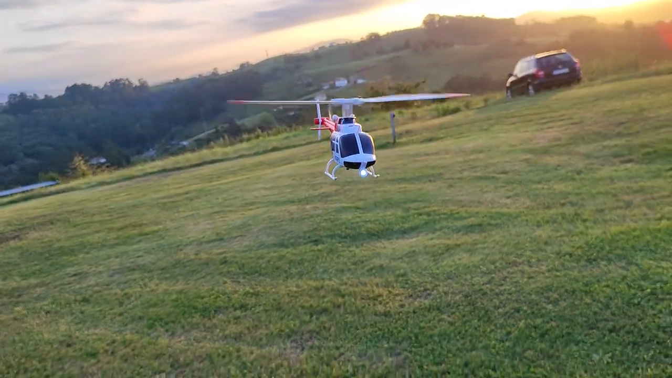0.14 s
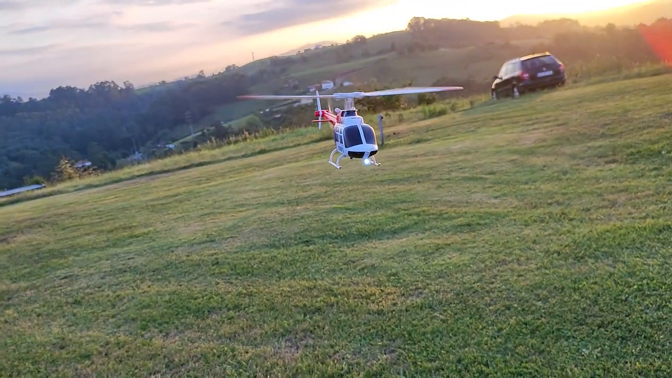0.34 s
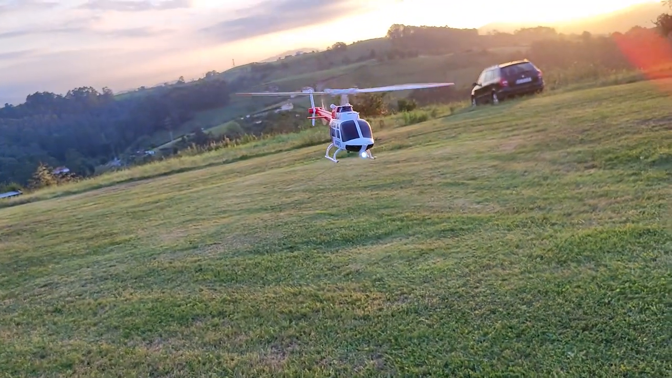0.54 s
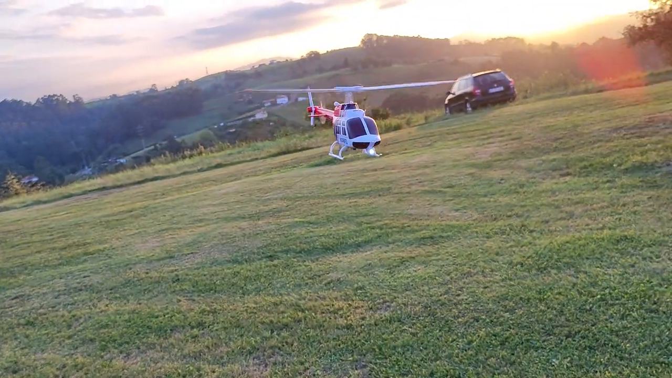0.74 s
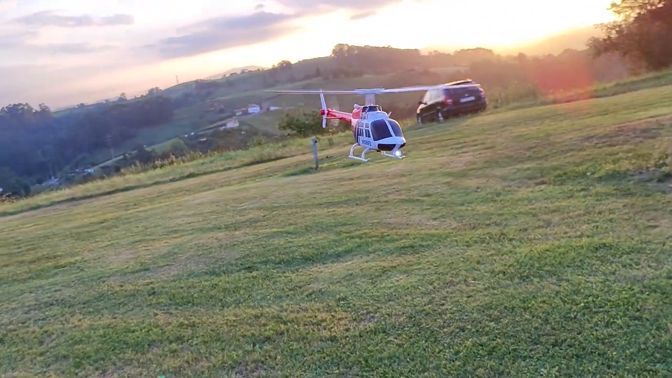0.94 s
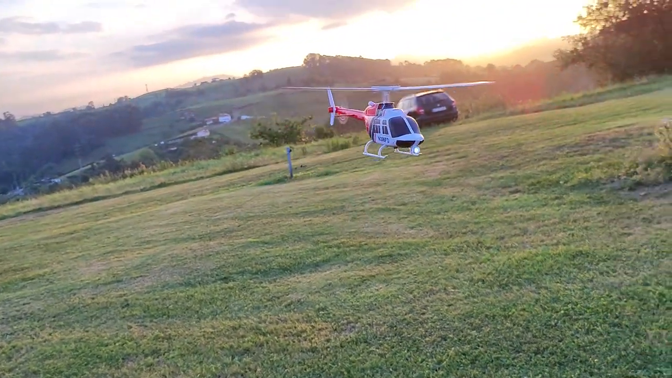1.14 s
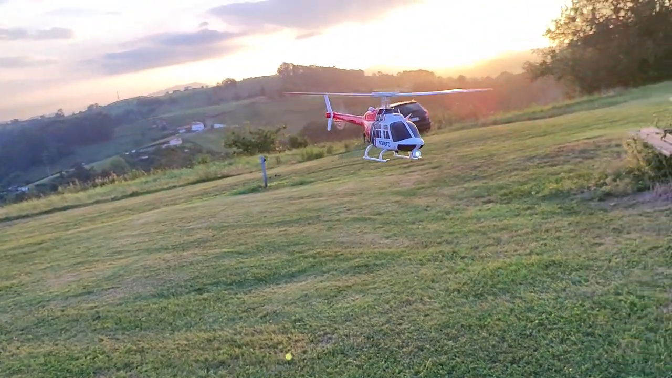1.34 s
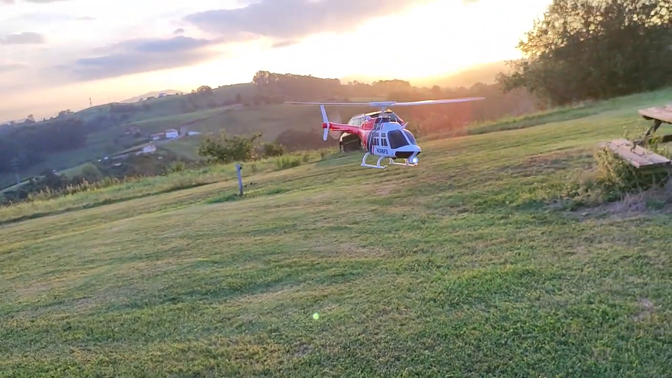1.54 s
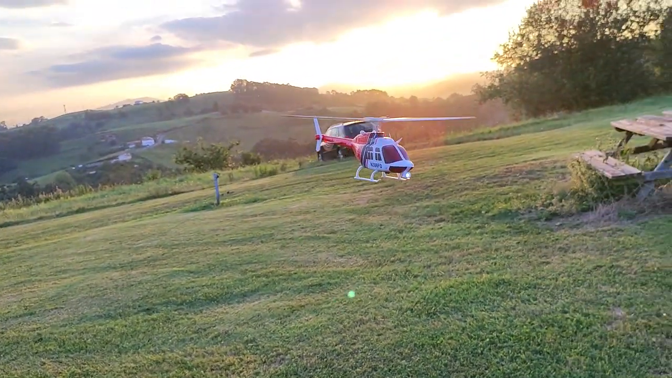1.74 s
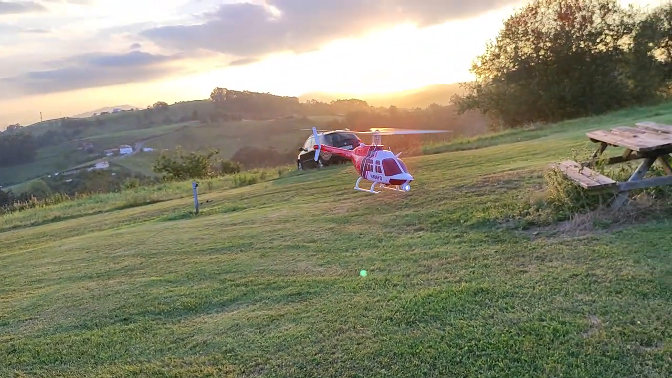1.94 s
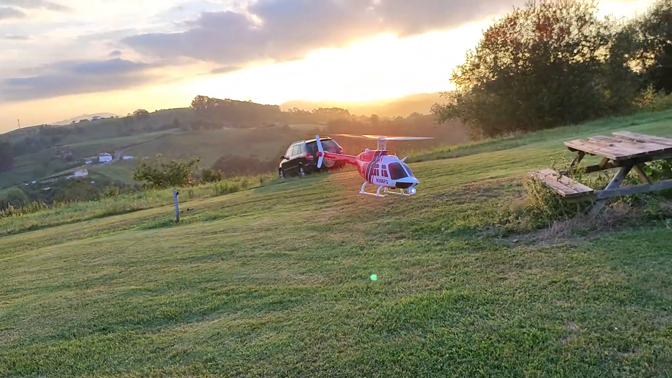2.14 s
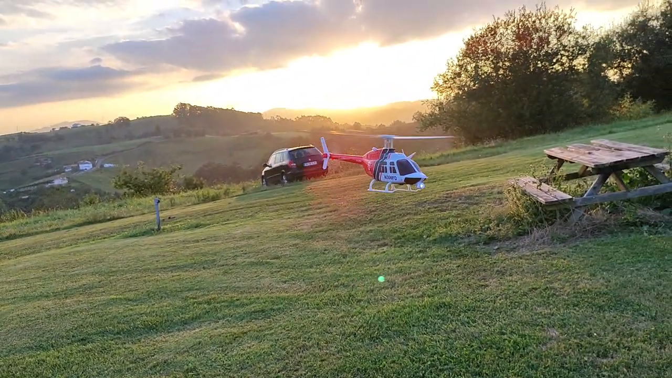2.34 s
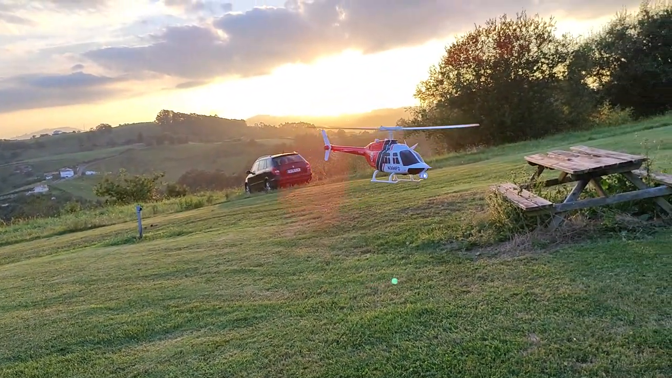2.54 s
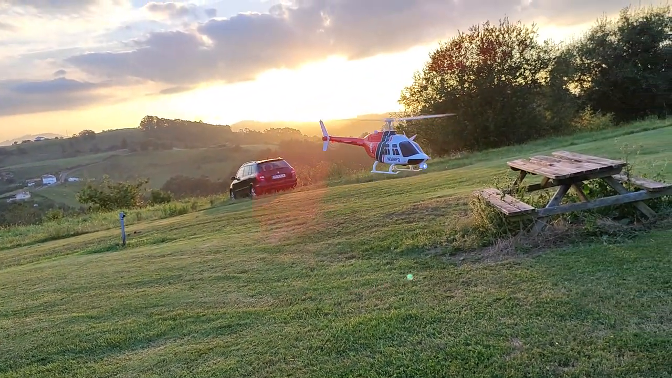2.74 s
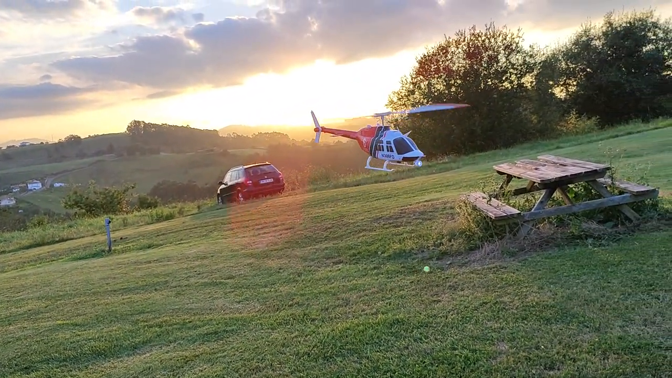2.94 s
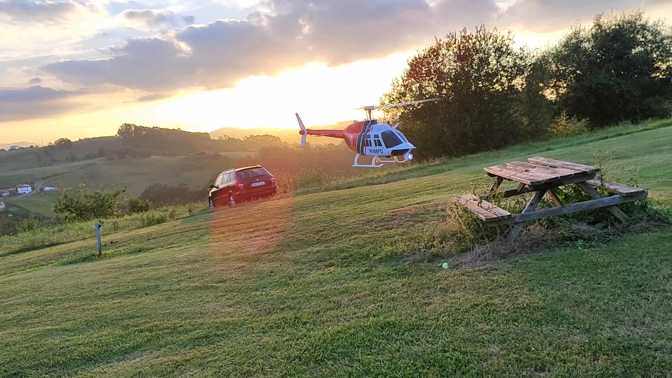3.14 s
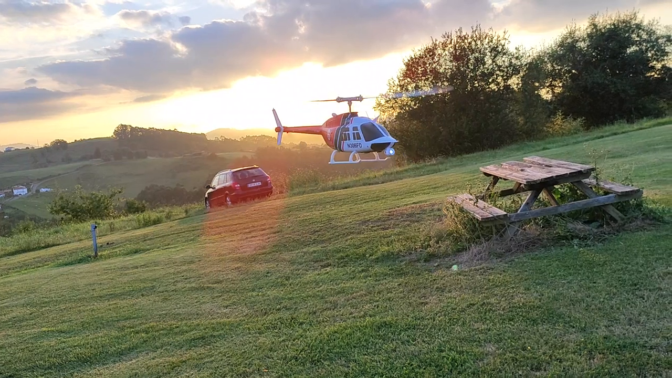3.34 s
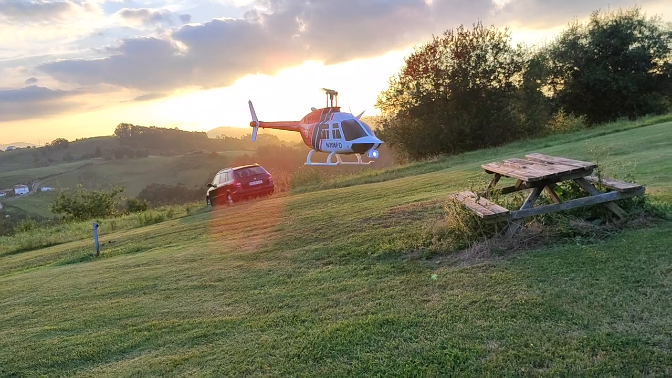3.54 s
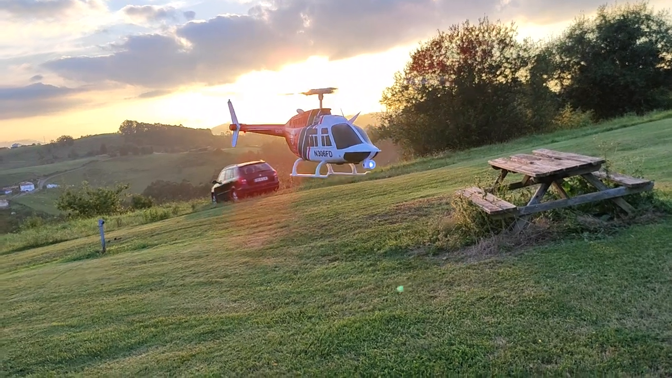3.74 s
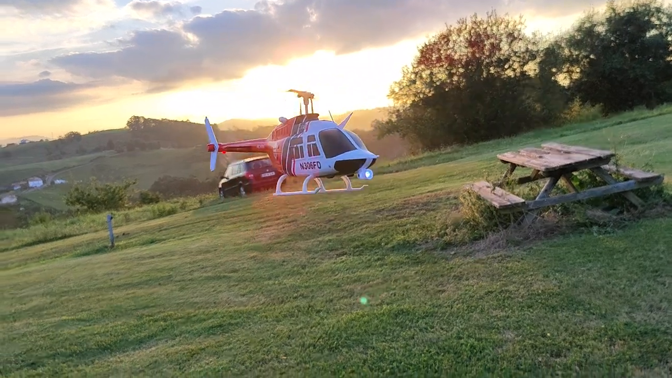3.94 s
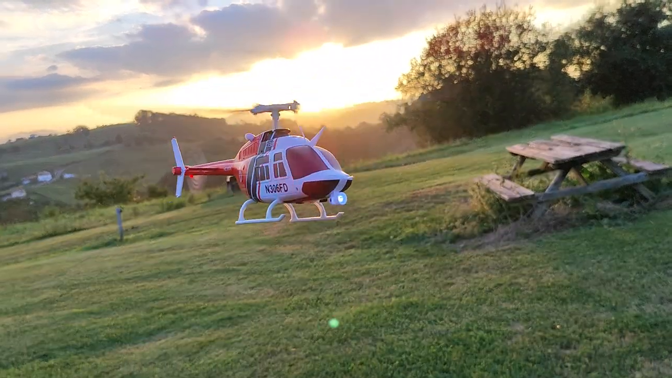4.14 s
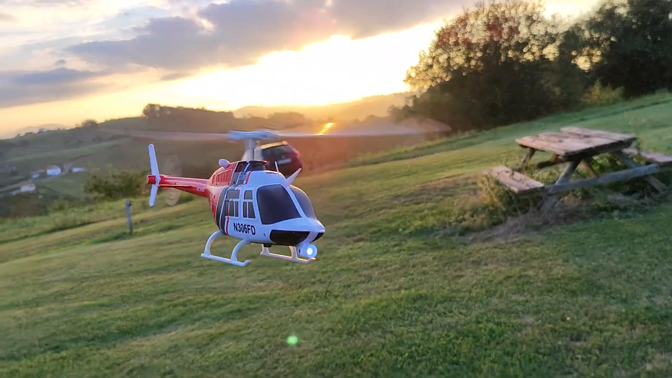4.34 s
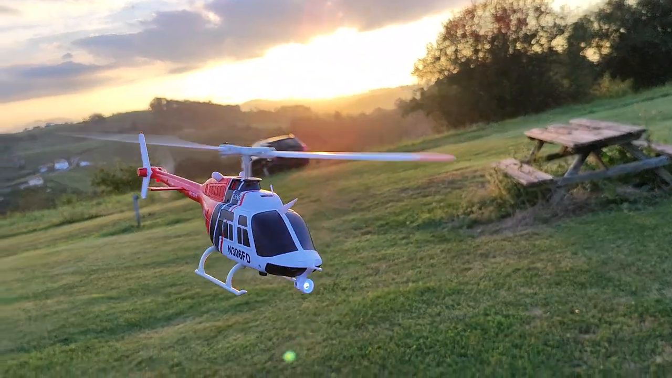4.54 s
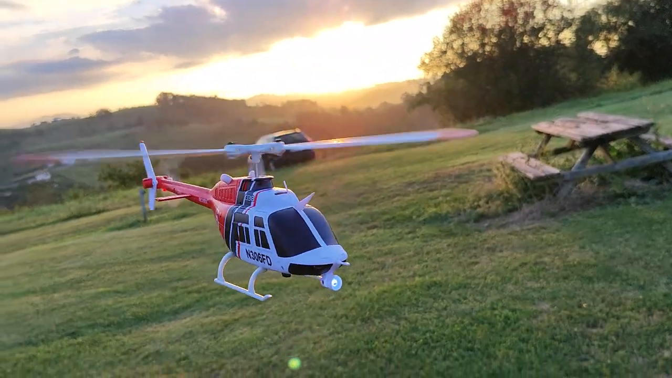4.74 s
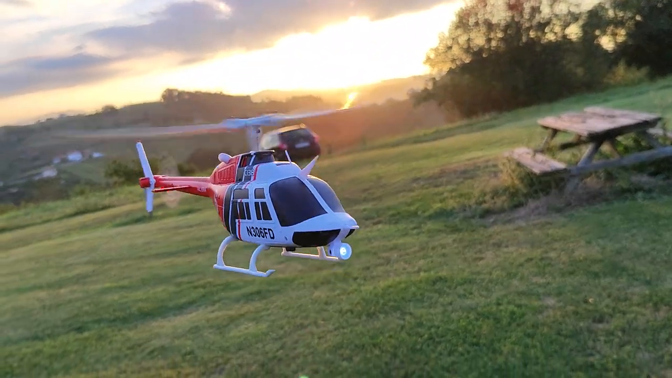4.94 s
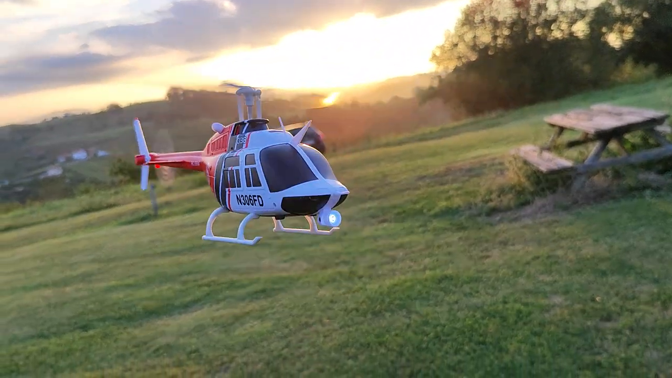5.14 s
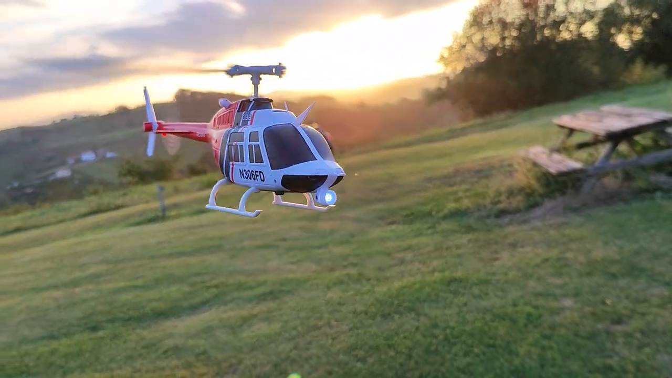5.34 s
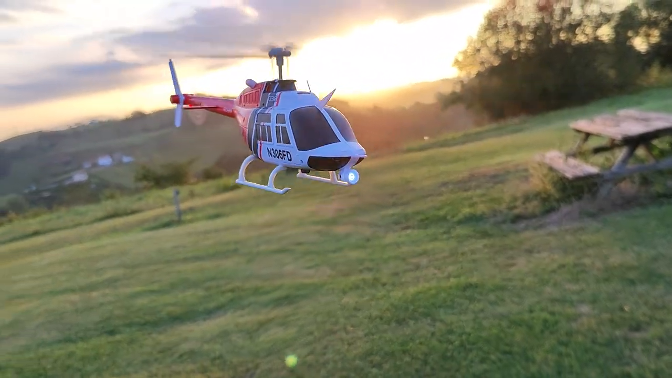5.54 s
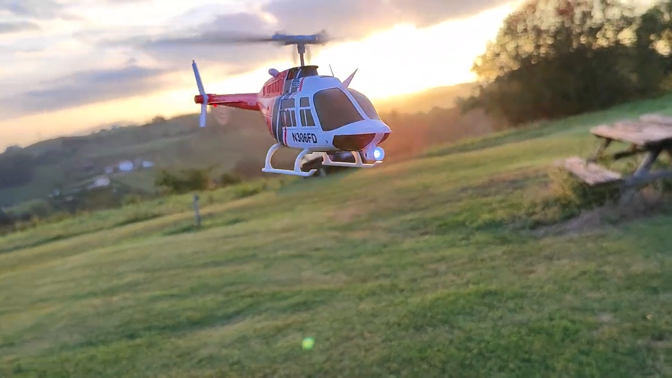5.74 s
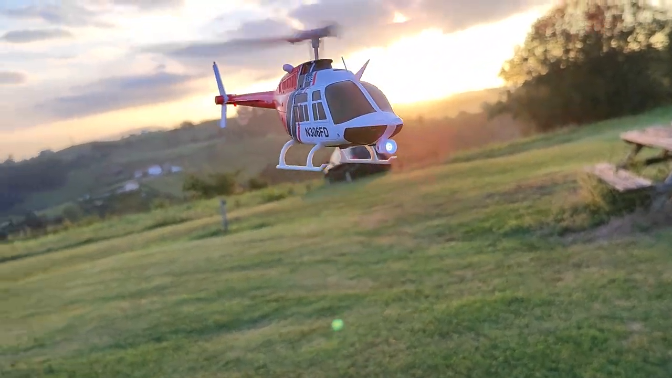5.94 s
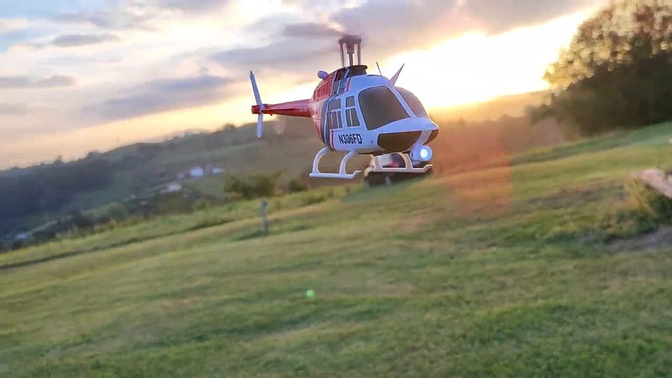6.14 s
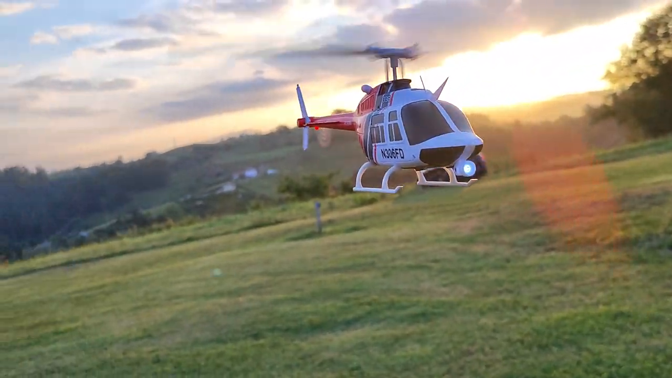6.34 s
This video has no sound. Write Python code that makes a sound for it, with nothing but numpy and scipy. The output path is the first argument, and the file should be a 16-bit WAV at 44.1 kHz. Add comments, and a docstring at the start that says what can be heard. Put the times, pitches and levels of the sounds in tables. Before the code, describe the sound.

Shrill high whine and hissing rotor wash of a small remote-controlled helicopter, fading as it moves away, then surging back near the microphone.

```python
"""A piercing gear whine leads: a small electric model helicopter hovers, drifts off and comes close.
One head speed drives the two blades, a motor geared nine to one and a nine-tooth pinion, whose third
mesh harmonic is the whine. Drive and blades are sums of multiples of that speed; noise shaped by
frequency is the air rushing off the blades. A hunting tail rotor and a faint breeze lie behind."""
import sys
import numpy as np
from scipy import signal
from scipy.fft import rfft, irfft, next_fast_len
from scipy.io import wavfile
from scipy.ndimage import uniform_filter1d, map_coordinates

SR = 44100
rng = np.random.default_rng(int(sys.argv[2]) if len(sys.argv) > 2 else 0)


def unload_wav(signal):
    """Save mono or channel-first audio to the path in sys.argv[1] as 16-bit WAV at rate SR, clipped to [-1, 1]."""
    wavfile.write(
        sys.argv[1],
        SR,
        np.round(np.clip(np.atleast_2d(signal).T, -1, 1) * 32767).astype(np.int16),
    )


N = 281358
T = np.arange(N) / SR  # seconds

# An order is a multiple of the main rotor speed. Levels are before the trims and swells in each layer.
# Flight and head speed
# main rotor speed before smoothing: start_s, speed_turns_per_s
HEAD_SPEED = [(0, 47.62), (0.14, 47.66), (0.3, 47.6), (0.57, 47.36), (0.72, 47.29), (0.86, 47.39),
              (1.08, 47.45), (1.38, 47.31), (1.58, 47.16), (1.78, 47.31), (1.9, 47.55), (2.08, 47.69),
              (2.3, 47.43), (2.48, 47.1), (2.58, 46.88), (2.8, 46.54), (3.08, 46.41), (3.25, 46.2),
              (3.45, 46.09), (3.9, 46.35), (4.28, 46.62), (4.41, 46.97), (4.53, 47.69), (4.63, 47.87),
              (4.73, 48.04), (4.9, 47.57), (5.1, 47.04), (5.38, 46.72), (5.5, 46.86), (5.77, 46.5),
              (5.97, 46.53), (6.17, 46.47), (6.38, 46.63)]
# distance from helicopter to microphone: start_s, distance_m
FLIGHT_PATH = [(0, 2.17), (1.2, 2.21), (2.2, 2.27), (3.1, 2.7), (3.7, 2.62), (4.2, 1.47), (4.8, 1.3),
               (5.3, 1.06), (5.8, 1.26), (6.38, 1.05)]
# time by which sound reaches the left port first: start_s, lead_ms
LEFT_LEAD = [(0, .072), (.5, .048), (1.4, .09), (2.1, .092), (2.7, .062), (3.15, .055), (3.5, .105),
             (3.95, .108), (4.5, .19), (5.3, .204), (5.9, .178), (6.38, .148)]

# Gears
# the whine, beamed by the gears so that it swells and fades as the body turns: start_s, level_db
WHINE_LEVEL = [(0, -32.4), (0.12, -28.6), (0.6, -29.3), (1, -29.2), (1.35, -29.7), (1.9, -32.7),
               (2.4, -35.8), (2.7, -51.3), (3.25, -49.0), (3.5, -42.9), (3.85, -45.6), (4.25, -33.2),
               (4.55, -24.7), (4.8, -24.3), (5, -24.5), (5.4, -27.2), (5.75, -36.7), (6.15, -28.5),
               (6.38, -39.4)]
# stereo place of the whine: start_s, left_minus_right_db
WHINE_PAN = [(0, -9.6), (1.2, -10.8), (2.4, -11.0), (2.8, 5.3), (3.6, -2.0), (3.95, 4.3), (4.35, -19.7),
             (4.6, -3.0), (4.85, -2.1), (5.3, -20.3), (5.6, -4.7), (6, -27.7), (6.38, -11.6)]
# gear mesh tone: start_s, level_db
MESH_LEVEL = [(0, -43.5), (0.2, -47.5), (0.9, -46), (1.4, -51), (2.2, -53.5), (2.6, -46.5), (3.1, -48.5),
              (3.6, -42.5), (4.25, -40.5), (4.5, -39), (4.8, -50), (5.1, -39.5), (5.35, -36.5),
              (5.7, -43.5), (6.2, -38), (6.38, -38.5)]
# stereo place of the mesh tone: start_s, left_minus_right_db
MESH_PAN = [(0, 3.5), (0.9, -3.5), (1.4, -2.4), (2.3, 4.8), (2.7, 5.3), (3.1, 8.6), (3.5, 2), (4, 2.5),
            (4.4, 3), (4.8, -9.2), (5.2, 0.6), (5.6, 2.6), (6.38, 7.7)]
# lines beside the mesh tone: order, relative_level_db
MESH_SIDEBANDS = [(71, -9), (72, -1), (73, -11), (77, -9), (78, -10), (79, -11), (82, -3), (83, -8),
                  (84, -9), (85, -2), (86, -7), (87, -13), (90, -4)]
# unevenness of the gear teeth round one turn: order, relative_level_db
TOOTH_RUNOUT = [(1, 0), (2, -10), (3, -15), (4, -11), (5, -17)]
# envelope of the rattle round the whine: order, relative_level_db
CHATTER_ENVELOPE = [(219, -24), (230, -19), (236, -22), (238, -9), (239, -5), (240, -15), (242, -13),
                    (244, -9), (246, -4), (247, 0), (248, -13), (249, -7), (250, -16), (252, -8),
                    (254, -16), (262, -25)]
# lines beside the whine, from the pinion wobbling once per motor turn: order, relative_level_db
PINION_WOBBLE = [(207, -11), (215, -6), (216, -2), (217, -8), (224, -6), (225, 3), (226, -8), (233, -7),
                 (234, -3), (235, -7), (261, -3), (270, -15)]

# Air: noise spectra
# low downwash: frequency_hz, relative_level_db_per_hz
WASH_SPECTRUM = [(150, -22), (300, -25), (400, -9), (550, -6.5), (680, -4.5), (850, -3), (1100, -8.5),
                 (1600, -14.5), (4000, -54)]
# mid-range rush: frequency_hz, relative_level_db_per_hz
RUSH_SPECTRUM = [(500, -24), (1000, 0), (1350, 8), (1650, 4.5), (2050, 7.5), (2500, 6), (2800, -4.5),
                 (3150, -2.5), (3450, 5.5), (3750, 6), (4050, 10.5), (4600, -2.5), (6500, 1), (9000, -25)]
# treble hiss: frequency_hz, relative_level_db_per_hz
HISS_SPECTRUM = [(2500, -34), (4600, 0.5), (5800, -2.5), (7600, -5.5), (8150, -16.5), (8900, 1),
                 (10200, 5.5), (11000, 1.5), (11500, 12), (12200, 7), (13200, -25), (14300, -2),
                 (15400, -0.5), (16000, -12)]
# downwash: start_s, level_db
WASH_LEVEL = [(0.0, -54.5), (0.35, -57.5), (2.74, -60.5), (3.0, -63), (3.75, -60.5), (4.3, -52.5),
              (4.74, -59.5), (4.82, -56), (5.17, -55.5), (5.22, -51.5), (5.61, -57), (6.38, -52.5)]
# hiss: start_s, level_db
HISS_LEVEL = [(0.0, -57.5), (1.06, -57), (1.94, -58.5), (2.18, -62.5), (2.5, -55.5), (3.14, -59),
              (3.59, -54.5), (4.37, -47), (4.73, -53.5), (5.15, -49), (6.17, -48.5), (6.38, -47.5)]

# Motor
# its once-a-turn hum: start_s, level_db
HUM_LEVEL = [(0.0, -65.5), (1.35, -56.5), (3.32, -55.5), (4.09, -47.5), (4.69, -51), (5.08, -47.5),
             (6.34, -48.5), (6.38, -51)]
# its overtones: order, level_db, power_of_distance_it_falls_with, left_minus_right_db
MOTOR_TONES = [(18, -41, 1.22, 0.4), (27, -47, 0.85, 1)]
# its seventh overtone: start_s, level_db
WHISTLE_LEVEL = [(0, -70), (2.5, -70), (3.0, -58.5), (3.9, -56.5), (4.7, -60), (6.38, -56)]
# buzz of the drive and its shell: order, relative_level_db
SHELL_ORDERS = [(14, -12), (20, -6), (22, -10), (24, -9), (25, -12), (31, -4), (32, -6), (38, -10),
                (40, -11), (41, -9), (43, -11), (45, -2), (50, -10), (54, -10)]
# its high overtones: order, relative_level_db
SINGING_ORDERS = [(162, -7), (189, -6), (322, -8), (324, 0), (325, -9), (326, -5)]

# Blades
# thrum of the two blades: start_s, level_db
THRUM_LEVEL = [(0.0, -62), (2.54, -59.5), (2.95, -64), (3.23, -57), (3.64, -61), (4.05, -51.5),
               (4.34, -51.5), (4.73, -42), (6.38, -47.5)]
# octave of the thrum: start_s, level_db
OCTAVE_LEVEL = [(0, -66.5), (1, -73.5), (2, -66), (3.3, -71), (3.8, -56), (4.5, -59), (4.9, -55),
                (5.3, -58.5), (5.7, -54.5), (5.88, -68), (6.1, -55.5), (6.38, -62)]
# fourth and higher blade overtones: start_s, level_db
FLUTTER_LEVEL = [(0, -56), (.9, -61), (2, -60.5), (2.8, -64), (3.6, -67), (4.4, -65), (6.38, -62.5)]
# higher blade overtones: order, relative_level_db
BLADE_ORDERS = [(10, 3), (11, -4), (12, -1), (13, -5)]
# throbs as the blades cut their own wake: centre_s, octave_and_third_swell_db, fourth_swell_db
WAKE_THROBS = [(.13, 9, -3), (.42, 11.5, -5), (.53, -0.5, 4), (.78, 7.5, 7), (1.0, -1.5, 9), (1.35, 10, -1),
               (1.57, 5.5, -1), (1.8, 0, 6), (2.0, 4, 8), (2.57, 2.5, 10), (2.75, 3, 8), (2.86, 4.5, 8),
               (4.4, 2, 7), (5.05, 2, 7), (5.37, 0.5, 8), (6.15, 2.5, 2)]

# Tail rotor and breeze
# tail blade rate before its waver: start_s, rate_hz
TAIL_RATE = [(0, 257), (.8, 248), (1, 255), (1.3, 248), (1.8, 257), (2.1, 254), (2.3, 248), (2.6, 254),
             (3, 255), (3.45, 270), (3.55, 264), (3.75, 272), (3.89, 264), (4.38, 273), (4.47, 264),
             (4.56, 267), (4.8, 259), (5.3, 248), (5.7, 245), (6.15, 267), (6.38, 258)]
# tail rotor buzz: multiple_of_tail_blade_rate, relative_level_db
TAIL_ORDERS = [(1, -17), (2, 4), (3, -8), (4, -11), (5, 5), (6, -9), (7, 0), (8, -6), (9, -9), (10, -5)]
# faint breeze: frequency_hz, relative_level_db_per_hz
BREEZE_SPECTRUM = [(15, -9), (40, -4), (80, 5.5), (140, 3), (230, -2.5), (400, -1.5), (1000, -46),
                   (4000, -64)]

# Microphone
# colour of the two ports: frequency_hz, left_minus_right_db
PORT_COLOUR = [(100, -5), (700, 0.5), (1400, 4), (2200, -2), (2900, 0), (4000, 5.5), (6000, 6.5),
               (7600, 1.5), (9000, -12), (10400, -3), (11500, -9), (12800, -6), (14000, 3), (15000, 5)]
# phase of the left port against the right: frequency_hz, phase_rad
PORT_PHASE = [(900, 0), (1400, -.15), (1900, -.8), (2300, -.75), (2700, 0), (4000, 0), (4700, -.9),
              (6000, 0)]
# likeness of the air noise at the two ports: frequency_hz, likeness_0_to_1
PORT_LIKENESS = [(50, 1), (700, 0.8), (2000, 0.9), (2500, .85), (2900, .45), (3600, .7), (5000, 0.2),
                 (9000, 0.15), (11500, .3), (15000, 0.2)]

INERTIA_S = .1  # the rotor's weight rounds off every change of speed
NEAR_M = 1.145  # distance at which nearness is 0 dB
EDGE_HZ = 15780  # top of the recorder's band
TREBLE_LAG_MS, MESH_LAG_MS = .035, .012  # extra delay of whine and mesh tone at the left port
# The whine roughens while the rotor speeds up (random shake in radians).
SPIN_UP_S, SPIN_UP_WIDTH_S, SHAKE_CALM, SHAKE_SPIN_UP = 4.6, .14, .06, .33
# The blades bite harder in a short climb, and the loaded teeth rattle more.
SURGE_S, SURGE_WIDTH_S, SURGE_DB, CHATTER_SURGE_DB = 5.27, .23, 3.5, 4.1
# Hiss swell at each blade passage, its growth per dB of nearness, and the swell of the rush.
CHOP_DB, CHOP_NEAR, RUSH_CHOP_DB = 1.5, .11, .45
# No two blade passages are alike: scatter, its growth per dB of nearness, its growth under load.
COARSE_DB, COARSE_NEAR, COARSE_SURGE_DB = 1.0, .06, .6
THROB_WIDTH_S, FLAP_WIDTH_S = .098, .055  # the fourth overtone answers more briefly
CLATTER_DB = -47.5  # at nearness 0 dB
# The tail rotor is loudest while it faces the microphone.
TAIL_DB, BROADSIDE_DB, BROADSIDE_S, BROADSIDE_WIDTH_S = -60, 14.5, 3.9, .9
BUFFET_S, BUFFET_WIDTH_S, BUFFET_DB = 5.38, .045, 4  # one puff of downwash reaches the microphone


def gears(turns):
    """81 teeth mesh per turn; uneven teeth shake the whine, adding sidebands one rotor speed apart."""
    whine_db, near_db = curve(WHINE_LEVEL), nearness()
    mesh_tone = tone(left_late(turns, MESH_LAG_MS), order=81)
    mesh = amp(curve(MESH_LEVEL) + 1.06 * wander(44)) * pan(curve(MESH_PAN)) * mesh_tone
    growl_lines = revolving(turns, MESH_SIDEBANDS, drift=.25, unsteady_db=1.5)
    growl = amp(-48 + 1.3 * near_db) * growl_lines

    tooth_timing = revolving(turns, TOOTH_RUNOUT, drift=.1, unsteady_db=1)
    roughness = SHAKE_CALM + SHAKE_SPIN_UP * bump(SPIN_UP_S, SPIN_UP_WIDTH_S)
    shake = .28 * tooth_timing + roughness * wander(110)  # radians of the whine
    treble_turns = left_late(turns, TREBLE_LAG_MS)
    shaken_turns = treble_turns + shake / (2 * np.pi * 243)
    whine_gain = amp(whine_db + .6 + .4 * wander(25)) * pan(curve(WHINE_PAN))
    whine = whine_gain * tone(shaken_turns, order=243)

    k = np.setdiff1d(np.arange(219, 263), [243])  # every order round the whine, but not the whine
    sidebands = np.column_stack([k, np.interp(k, *np.transpose(CHATTER_ENVELOPE))])
    rattle = revolving(treble_turns, sidebands, drift=.2, unsteady_db=2)
    follow_db = .36 * (whine_db - whine_db.mean())  # the rattle partly follows the whine
    chatter = amp(-39 + follow_db + .6 * near_db + CHATTER_SURGE_DB * surge()) * rattle
    wobble_lines = revolving(treble_turns, PINION_WOBBLE, drift=.25, unsteady_db=2)
    wobble = amp(-46.5 + .75 * near_db) * wobble_lines
    return mesh + growl + whine + chatter + wobble


def air(turns):
    """Turbulence off the blades swells at each passage, more deeply and unevenly at close range."""
    near_db = nearness()
    passage, once = tone(turns, order=2), tone(turns, order=1)
    gusts_db = .35 * wander(20)
    coarse_db = COARSE_DB + COARSE_NEAR * near_db + COARSE_SURGE_DB * surge()
    rush_grain_db, hiss_grain_db = coarse_db * wander(130), coarse_db * wander(130)

    wash_db = curve(WASH_LEVEL) + 4.5 + .5 * wander(7.3) + .37 * passage
    rush_chop_db = RUSH_CHOP_DB * (passage + tone(turns, order=4) + tone(turns, order=9))
    rush_db = -44.5 + .97 * near_db + .79 * broadside() + SURGE_DB * surge()
    rush_db = rush_db + rush_chop_db + rush_grain_db + gusts_db
    hiss_chop_db = (CHOP_DB + CHOP_NEAR * near_db) * passage + .3 * once
    hiss_db = curve(HISS_LEVEL) + 10.5 + hiss_chop_db + hiss_grain_db + gusts_db

    wash = amp(wash_db) * noise(WASH_SPECTRUM)
    rush = amp(rush_db) * noise(RUSH_SPECTRUM)
    hiss = amp(hiss_db) * noise(HISS_SPECTRUM)
    return wash + rush + hiss


def motor(turns):
    """The motor sings at nine times the rotor speed and shakes the shell."""
    near_db = nearness()
    hum_gain = amp(curve(HUM_LEVEL) + 1.0 + .7 * wander(5)) * pan(11.0)
    layers = hum_gain * tone(turns, order=9)
    for order, level_db, falloff, side_db in MOTOR_TONES:
        gain = amp(level_db + falloff * near_db + .7 * wander(5)) * pan(side_db)
        layers = layers + gain * tone(turns, order)
    whistle = amp(curve(WHISTLE_LEVEL) + 2 * wander(27)) * tone(turns, order=63)
    shell = revolving(turns, SHELL_ORDERS, drift=.35, unsteady_db=2)
    buzz = amp(-50 + 1.4 * near_db) * shell
    singing_lines = revolving(turns, SINGING_ORDERS, drift=.56, unsteady_db=4.0)
    singing = amp(-56.0 + .33 * near_db) * singing_lines
    return layers + whistle + buzz + singing


def blades(turns):
    """Two blades thrum twice per turn; their overtones come and go in the stirred air."""
    throb_db = sum(db * bump(s, THROB_WIDTH_S) for s, db, _ in WAKE_THROBS)
    flap_db = sum(db * bump(s, FLAP_WIDTH_S) for s, _, db in WAKE_THROBS)
    stirred = turns + .012 * wander(14)  # rotor angle in turns

    thrum_db = curve(THRUM_LEVEL) + .4 + .83 * wander(2.5)
    octave_db = curve(OCTAVE_LEVEL) + throb_db + 2 * wander(8)
    third_db = -59.0 + 1.32 * nearness() + throb_db + 2.5 * wander(8)
    fourth_db = curve(FLUTTER_LEVEL) - .5 + flap_db + 1.5 * wander(8)

    thrum = amp(thrum_db) * pan(5.1) * tone(turns, order=2)
    octave = amp(octave_db) * pan(3.1) * tone(turns, order=4)
    third = amp(third_db) * pan(1.5) * tone(stirred, order=6)
    fourth = amp(fourth_db) * pan(-1.6) * tone(stirred, order=8)
    upper_lines = revolving(stirred, BLADE_ORDERS, drift=.99, unsteady_db=2.5)
    overtones = amp(curve(FLUTTER_LEVEL) - 3) * upper_lines
    return thrum + octave + third + fourth + overtones


def clatter(turns):
    """Play in the rotor head's linkages repeats every turn, a dense comb of faint lines."""
    k = np.arange(15, 55)
    # the comb takes its colour from the rush
    orders = np.column_stack([k, spectrum_at(RUSH_SPECTRUM, k * curve(HEAD_SPEED).mean())])
    comb = revolving(turns, orders, drift=.3, unsteady_db=2.5)
    return amp(CLATTER_DB + .9 * nearness()) * comb


def tail_rotor():
    """The small rotor keeps changing speed to hold the heading, so its lines waver."""
    rate_hz = curve(TAIL_RATE) * (1 + .004 * wander(15))
    tail_turns = at_ports(np.cumsum(rate_hz) / SR)
    buzz = revolving(tail_turns, TAIL_ORDERS, drift=.3, unsteady_db=2)
    return amp(TAIL_DB + .8 * nearness() + BROADSIDE_DB * broadside()) * buzz


def breeze():
    """Faint low noise drifts in level, with one brief puff of downwash."""
    puff_db = BUFFET_DB * bump(BUFFET_S, BUFFET_WIDTH_S)
    level_db = -59.5 + .21 * nearness() + 2.3 * wander(1.3) + puff_db
    return amp(level_db) * noise(BREEZE_SPECTRUM, shared=.9)


def nearness():
    """Decibels gained by distance alone."""
    return 20 * np.log10(NEAR_M / curve(FLIGHT_PATH))


def surge():
    """From 0 to 1: the extra load of the short climb."""
    return bump(SURGE_S, SURGE_WIDTH_S)


def broadside():
    """From 0 to 1: how squarely the tail rotor faces the microphone."""
    return bump(BROADSIDE_S, BROADSIDE_WIDTH_S)


def tone(turns, order):
    """One sine of unit rms at a multiple of the rotor speed."""
    return np.sqrt(2) * np.sin(2 * np.pi * (order * turns + rng.random()))


def revolving(turns, orders, drift, unsteady_db, count=80, size=8192):
    """A pattern repeats at every turn, while its partials slowly slip in phase and strength."""
    k, db = np.transpose(orders)
    k = np.round(k).astype(int)
    slip, swell = rng.standard_normal((2, count, len(k)))
    phase = 2 * np.pi * rng.random(len(k)) + drift * np.cumsum(slip, axis=0)
    turn_hz = (turns[1, -1] - turns[1, 0]) / T[-1]
    snapshot = T / T[-1] * (count - 1)  # glide through the successive one-turn waveforms
    out = []
    for angle, gain in zip(turns, port_response(k * turn_hz)):
        partials = np.zeros((count, size // 2 + 1), complex)
        partials[:, k] = gain * amp(db + unsteady_db * swell) * np.exp(1j * phase)
        place = [snapshot, angle % 1 * size]
        out.append(map_coordinates(irfft(partials), place, order=1, mode="grid-wrap"))
    return unit_rms(np.array(out))


def noise(spectrum, shared=1):
    """Coloured noise, partly shared by the two ports according to frequency."""
    size = next_fast_len(N)
    hz = np.fft.rfftfreq(size, 1 / SR)
    a, b = rfft(rng.standard_normal((2, size)))
    same = np.clip(shared * spectrum_at(PORT_LIKENESS, hz), 0, 1)
    pair = np.array([a, same * a + np.sqrt(1 - same ** 2) * b])
    coloured = pair * amp(spectrum_at(spectrum, hz)) * port_response(hz)
    left, right = irfft(coloured, size)[:, :N]
    return unit_rms(np.array([at_ports(left)[0], right]))


def at_ports(x):
    """The left port hears the helicopter a little earlier than the right."""
    lead = curve(LEFT_LEAD) * SR / 1000  # samples
    left = map_coordinates(x, [np.arange(N) + lead], order=3, mode="nearest")
    return np.array([left, x])


def left_late(turns, ms):
    """The rotor angle with a further delay at the left port."""
    return turns - np.array([[1], [0]]) * curve(HEAD_SPEED) * ms / 1000


def port_response(hz):
    """Complex left and right gains: the colour and phase of the two ports."""
    left_phase = np.array([[1], [0]]) * spectrum_at(PORT_PHASE, hz)
    return pan(spectrum_at(PORT_COLOUR, hz)) * np.exp(1j * left_phase)


def pan(db):
    """Left and right gains of constant power, from their difference in decibels."""
    pair = np.array([amp(db / 2), amp(-db / 2)]).reshape(2, -1)
    return pair / np.sqrt(np.mean(pair ** 2, axis=0))


def wander(rate_hz):
    """Random motion of unit rms, low-passed with a Gaussian slope."""
    hz = np.fft.rfftfreq(N, 1 / SR)
    return unit_rms(irfft(rfft(rng.standard_normal(N)) * np.exp(-(hz / rate_hz) ** 2), N))


def bump(s, width_s):
    """A smooth rise from 0 to 1 and back around a moment."""
    return np.exp(-((T - s) / width_s) ** 2)


def curve(rows):
    """A two-column time table, drawn sample by sample."""
    s, value = np.transpose(rows)
    return np.interp(T, s, value)


def spectrum_at(points, hz):
    """A frequency table read on a log-frequency axis."""
    f, value = np.transpose(points)
    return np.interp(np.log(hz + 1), np.log(f + 1), value)


def amp(db):
    """Decibels to gain."""
    return 10 ** (np.asarray(db) / 20)


def unit_rms(x):
    """Scales to an rms of one."""
    return x / np.sqrt(np.mean(x ** 2) + 1e-20)


def scene():
    """The helicopter over a faint breeze; its sway keeps shifting the path to each port."""
    speed = uniform_filter1d(curve(HEAD_SPEED), round(INERTIA_S * SR)) * (1 + .0001 * wander(19.6))
    turns = at_ports(np.cumsum(speed) / SR)
    swaying = turns + .00024 * np.array([wander(1.0), wander(6.1)])  # turns, left and right
    drive = gears(swaying) + motor(swaying)
    rotor = air(turns) + blades(turns) + clatter(turns)
    return drive + rotor + tail_rotor() + breeze()


def record(dry):
    """The recorder's band limit, a steep low-pass."""
    taps = signal.firwin(511, EDGE_HZ, window=("kaiser", 9), fs=SR)
    return signal.oaconvolve(dry, taps[None], "same")


dry = scene()
out = record(dry)
unload_wav(out)
```